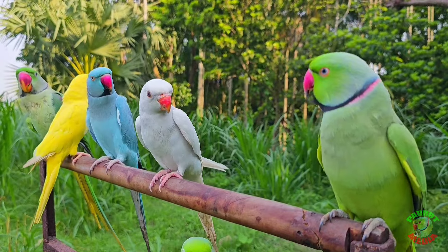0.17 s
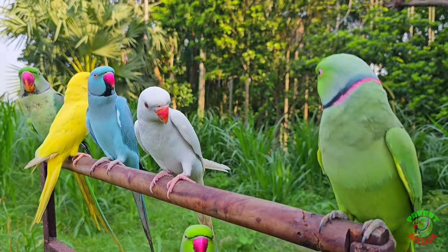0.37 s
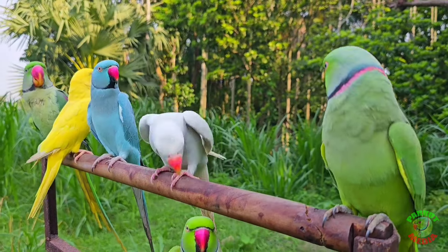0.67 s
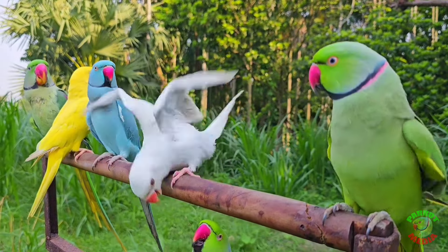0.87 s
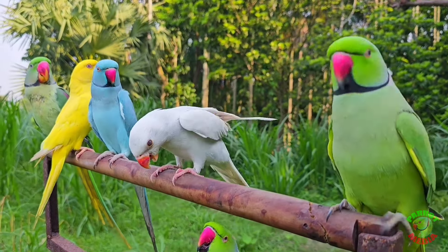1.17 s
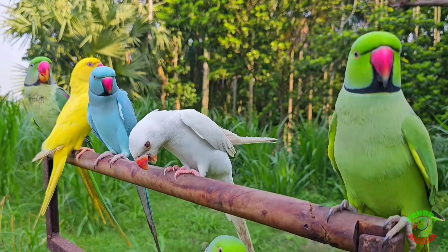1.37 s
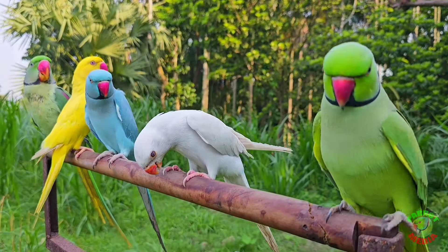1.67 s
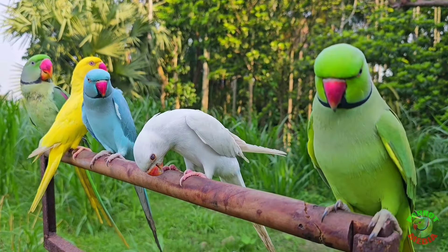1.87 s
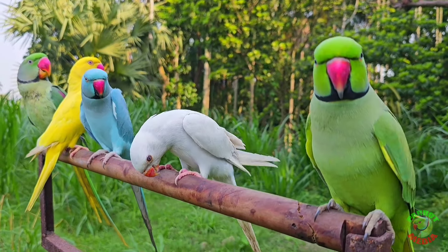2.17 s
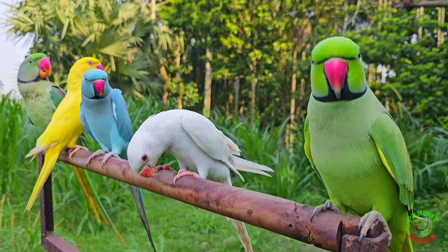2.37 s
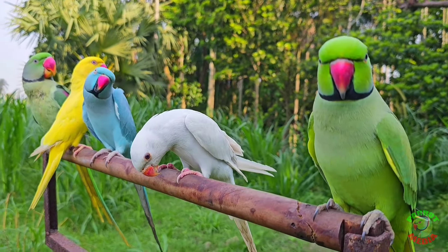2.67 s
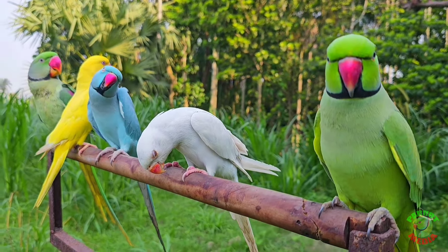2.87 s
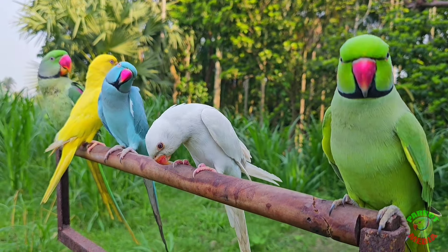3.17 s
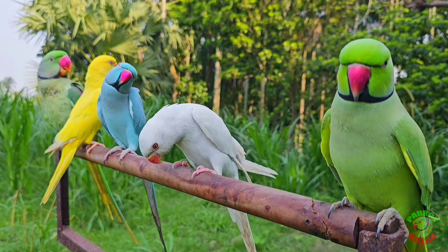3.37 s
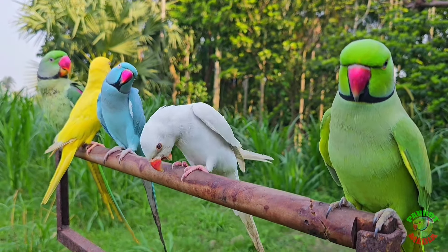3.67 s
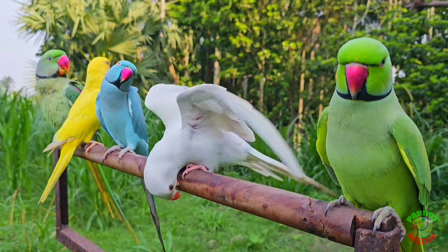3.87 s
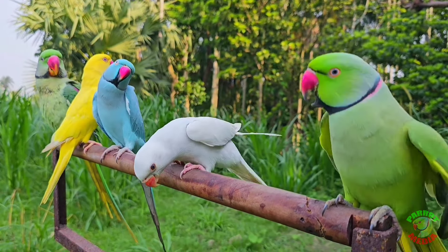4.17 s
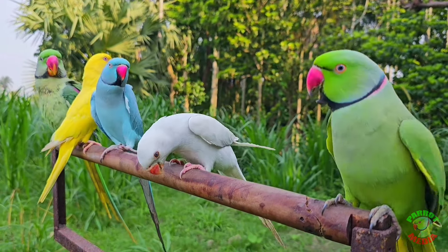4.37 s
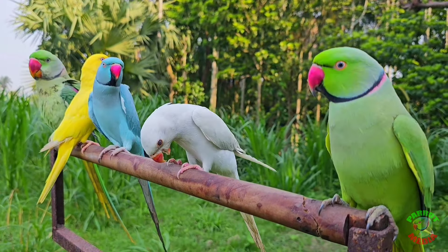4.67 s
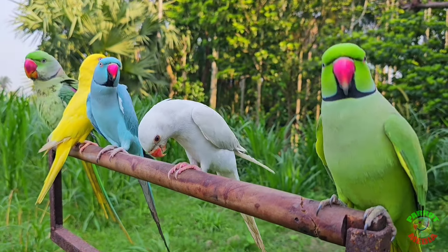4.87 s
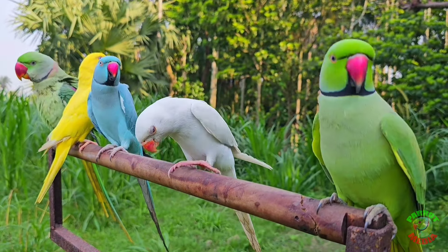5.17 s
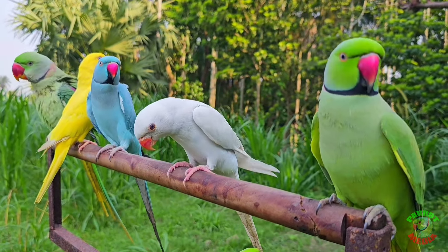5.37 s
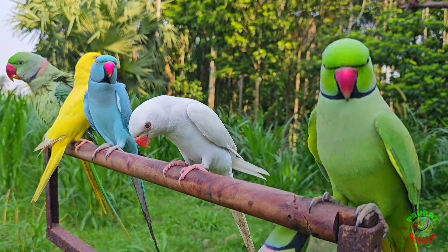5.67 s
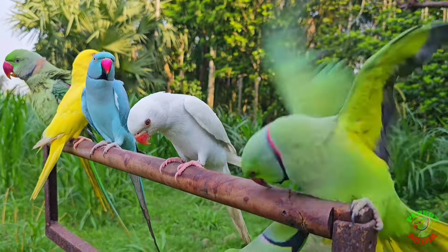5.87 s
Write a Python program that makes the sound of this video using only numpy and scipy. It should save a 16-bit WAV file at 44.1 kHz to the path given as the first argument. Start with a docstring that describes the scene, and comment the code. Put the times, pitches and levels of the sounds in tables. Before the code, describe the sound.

Parakeets very close to a stereo microphone in a quiet garden. A brief whistle and sliding yelp open, then a soft two-swell nasal warble. Whines and harsh squawks follow, then a trilled screech, bright yelps, low honks and soft wing flutter. After a lull, a rapid, evenly spaced run of raspy squawks slightly overloads the microphone. It quiets again until a last trilling screech with wing beats. Low air rumble and faint far birds lie beneath.

```python
"""Garden perch: ring-necked parakeets call close to a stereo microphone.
Squawks, whistles, yelps and screeches mix pitched harmonics with bursts of rasp that grow with chaos.
A warble, whines, grumbles and honks are harmonic buzzes coloured by a throat, with a little air.
Short blips make microphone overload crackle, decaying noise ticks, noise puffs wing beats, gliding sines far birds.
Noise tails return a faint echo; coloured noise makes the low outdoor rumble and far chorus."""
import sys
import numpy as np
from scipy import signal
from scipy.fft import rfft, irfft
from scipy.io import wavfile
from scipy.ndimage import map_coordinates

SR = 44100
rng = np.random.default_rng(int(sys.argv[2]) if len(sys.argv) > 2 else 0)


def generate_wav(sig):
    """Save sig (samples, or channels by samples) to the path in sys.argv[1] as 16-bit PCM at SR."""
    pcm = np.round(np.clip(np.atleast_2d(sig).T, -1, 1) * 32767).astype(np.int16)
    wavfile.write(sys.argv[1], SR, pcm)


N = 265967
TIME = np.arange(N) / SR

# In call tables, dB levels precede throat and mix gains; lag delays the right port.

# Harsh squawks: sweep to a crest, settle, sag, break off. Each row: crest time, rise, hold and release
# in seconds, crest, held and final pitch (before the drop) in Hz, tone effort in dB, odd harmonics in dB re
# effort, extra fourth harmonic in dB, rasp in dB, rasp at the break in dB re held rasp, left minus right
# in dB (before the beam), lag in ms.
HARSH_SQUAWKS = [(.083, 0.029, .002, .003, 2800, 2730, 2880, -18.5, -9, -12, -44, 1, 3, 0.31),
                 (1.695, 0.0062, 0.086, 0.046, 2360, 1854, 1797, -19, -10, 4.5, -20.5, 0, -0.5, 0.19),
                 (1.952, 0.0058, 0.071, 0.07, 1793, 1808, 1653, -12, -23, -2.5, -19.5, -0.5, -4, 0.21),
                 (2.225, 0.0046, 0.074, 0.067, 2392, 1807, 1734, -12, -19.5, 0.5, -20, 1.5, -13.5, 0.08),
                 (3.583, 0.0045, 0.065, 0.066, 2375, 1963, 1803, -12, -14.5, -1, -16.5, -4.5, -2.5, 0.094),
                 (3.812, .044, .002, 0.0046, 2480, 2490, 2450, -18.5, -8.5, 0.5, -26, 3.5, -5.5, .13),
                 (3.817, .004, .083, 0.064, 2350, 1882, 1647, -11.5, -15.5, 1.5, -18, -3.5, -6, .13),
                 (4.059, .04, 0.1, 0.042, 2448, 1870, 1606, -13.5, -13, 2.5, -19, 2.5, -4, .13),
                 (4.168, 0.014, 0.0012, 0.003, 2470, 2400, 2400, -13, -8, -12, -9.5, -3.5, -8.5, 0.093),
                 (4.319, .044, .094, 0.036, 2227, 1780, 1566, -13, -10.5, 0, -23, 2.5, -7.5, .32),
                 (4.567, 0.034, 0.087, 0.062, 2294, 1826, 1540, -14.5, -13, 2, -19.5, 3, -10.5, 0.12),
                 (4.821, .038, 0.1, 0.05, 2220, 1882, 1529, -12.5, -14.5, 0, -17.5, -2, -9.5, 0.11),
                 (5.076, 0.04, 0.093, 0.045, 2320, 1706, 1511, -13.5, -15.5, -2, -20.5, 1.5, -8.5, 0.13)]
# Screeches: same course, settling and dropping more slowly, with a fast trill. Columns as HARSH_SQUAWKS.
SCREECH_CALLS = [(2.669, .018, .055, 0.026, 1713, 1734, 1612, -10, -47, 0.0071, -23.5, -3.5, 6.4, .058),
                 (5.903, .037, 0.046, 0.15, 2706, 2264, 2040, -10.5, -10.5, 0.0015, -25.5, 3, 3.5, 0.049)]
# Whistles: arch over and fall. Each row: start and length in seconds, top and end pitch in Hz, second
# harmonic in dB, fourth harmonic in dB re second, rasp in dB, left minus right in dB, lag in ms.
WHISTLE_CALLS = [(0.081, 0.061, 1906, 1545, -10, -13, -38, -0.5, .342),
                 (0.205, 0.0177, 2067, 1700, -21, -25, -29.5, -7, 0.346),
                 (1.655, 0.033, 1835, 1585, -9, 1, -16.5, -8.5, .2),
                 (1.73, .08, 1845, 1800, -21, -8, -42, 4, .2),
                 (1.901, 0.061, 1236, 1200, -26.5, -16, -25, -13, .19),
                 (2.192, 0.028, 1779, 1480, -12.5, 1, -19, -22.5, .072),
                 (3.501, 0.041, 1825, 1810, -35, -12.5, -34, -10, .13),
                 (3.518, 0.061, 1923, 1650, -9.5, -3.5, -16.5, -20.5, .13),
                 (4.171, .05, 2053, 1574, -6.5, -11, -25, 3, .0031),
                 (4.363, 0.056, 1900, 1646, -14.5, -13.5, -53.5, 7, .28),
                 (4.677, 0.049, 1620, 1310, -30.5, -8, -41, -4, .112)]
# Reedy yelps: hold, then slide, nearly always down. Each row: start, length and hold in seconds, start and
# end pitch in Hz, tone effort in dB, odd harmonics in dB re effort, rasp in dB, left minus right in dB, lag in ms.
YELP_CALLS = [(0.142, 0.087, 0.049, 2570, 1336, -13.5, -14.5, -35, 6, 0.32),
              (2.717, 0.063, 0.001, 3014, 2696, -13, -26, -49, 3, 0.012),
              (2.753, 0.076, .002, 2838, 3200, -12.5, -19, -32, 7, 0.017),
              (2.821, 0.13, 0.044, 2158, 1360, -18, -16, -36, 11, 0.031),
              (4.219, 0.046, 0.0013, 2560, 1233, -10, -17.5, -23, 4.5, 0.0024),
              (4.42, 0.085, .043, 2600, 1290, -13.5, -15, -31, 1.5, 0.334),
              (5.109, 0.17, 0.097, 2169, 1493, -20.5, -12.5, -33, 3.5, 0.2)]
# Throat resonances on the even harmonics of each call. Each row: frequency in Hz, gain in dB.
HARSH_RESONANCES = [(1000, -33.5), (2400, -19), (3050, -6.5), (3350, -8.5), (3750, 0), (4400, -5),
                    (4950, -18), (5800, -13.5), (6800, -3), (7250, -6), (7700, -11.5), (9500, -12)]
SCREECH_RESONANCES = [(1200, -25), (2700, -28.5), (3150, -10), (3650, -5.5), (4250, 1.5), (4750, 0.5),
                      (5200, -7.5), (7000, -25), (9500, -39)]
YELP_RESONANCES = [(2500, -19), (3100, -8.5), (3600, -1), (4050, 1), (4500, -10), (5100, -13), (5900, -12),
                   (7200, -24), (8500, -20.5), (11000, -26)]
# Squawk overtones. Each entry: harmonic number, level in dB re odd level or fourth harmonic level.
ODD_OVERTONES = {1: -2.5, 3: -2.5, 5: -13, 7: -23.5}
EVEN_OVERTONES = {4: -2.5, 6: -17, 8: -15.5}
# Noisy skirt around each harmonic. Each entry: harmonic number, relative level in dB.
RATTLE_SKIRTS = {1: -15.5, 2: -1.5, 3: -8.5, 4: -7, 5: -1.5}
# Spectrum of turbulent air in the voice. Each row: frequency in Hz, relative level in dB.
AIR_COLOUR = [(300, -39.5), (700, -20), (1200, -13.5), (1900, -3.5), (3200, 1.5), (4800, -2), (6500, 0),
              (8500, -0.5), (11000, -4.5), (13000, -1), (15500, -16)]

# Long warble course. Each row: time in seconds, pitch in Hz, level over the harmonics in dB.
WARBLE_COURSE = [(0.605, 820, -57), (0.625, 747, -46), (0.681, 806, -40), (0.765, 755, -37.5),
                 (0.827, 682, -45.5), (0.895, 695, -49), (0.975, 963, -24.5), (1.013, 986, -24.5),
                 (1.111, 698, -49), (1.151, 742, -46), (1.225, 1060, -24.5), (1.293, 1078, -25),
                 (1.335, 953, -28), (1.393, 594, -36.5), (1.41, 611, -80)]
# Warble brightens with level. Each row: level in dB, tilt in dB per octave.
WARBLE_TILT = [(-43.5, -1), (-43, -3.5), (-35, 7)]
# Whines, gliding down. Each row: start and length in seconds, start and end pitch in Hz, bend (positive glides
# early, negative late), start, middle and end level in dB, tilt in dB per octave, left minus right in dB, lag in ms.
WHINE_CALLS = [(1.435, 0.24, 1128, 698.7, 5.5, -43, -30.5, -26, 1.5, 4, 0.18),
               (2.118, 0.11, 1277, 642, 2.2, -31.5, -22.5, -27, 5.5, 6.5, 0.18),
               (2.364, .088, 1740, 1162, -2.5, -23, -17, -26, 8.5, 3.5, 0.042),
               (2.445, 0.27, 1274, 1158, 3, -26, -19.5, -33.5, 11, 4, 0.081)]
# Rougher grumbles, gliding mostly down. Columns as WHINE_CALLS.
GRUMBLE_CALLS = [(1.83, 0.076, 2150, 1387, 2, -47, -26, -21.5, -2, 5, 0.19),
                 (1.895, 0.13, 1213, 868, 3.94, -31, -28.5, -29, 6, -1, 0.18),
                 (3.53, 0.14, 614, 702, .5, -35, -35, -34, -2, -1.5, 0.039),
                 (3.65, 0.069, 704, 649, -0.5, -33.5, -29.5, -28, 0, -1, 0.031),
                 (3.92, .065, 1240, 1125, 2.5, -36, -27.5, -34, 2, -1, 0.025),
                 (2.425, .06, 1012, 550, 1, -42, -36.5, -34.5, -3, 2.5, 0.14),
                 (4.13, 0.046, 786, 797.5, 1, -34, -30.5, -24, -1.5, 0.5, 0.039),
                 (4.93, 0.143, 686, 702, 0.82, -43, -31.5, -28.5, 1, 3, 0.24),
                 (5.07, 0.13, 710, 679, -0.5, -35, -39.5, -45, 7.5, 1, .21)]
# Honks: start firm, ease off, swell again. Each row: start and length in seconds, start, middle and end
# pitch in Hz, eased level in dB, final swell in dB re eased, left minus right in dB, lag in ms.
HONK_CALLS = [(2.52, 0.15, 578.6, 565.7, 624, -35.5, 18, 1, 0.028),
              (2.765, 0.1926, 587, 607.5, 675, -34, 17, -0.5, -0.036),
              (3.062, 0.16, 557, 584, 569.4, -36, 5, 2, -0.037)]
# Throat and beak colour of each nasal call. Each row: frequency in Hz, gain in dB.
WARBLE_COLOUR = [(600.0, -4.5), (850.0, -2.5), (1200.0, -8), (1700.0, -2), (2300.0, -10.5), (3000.0, -13),
                 (3700.0, -12.5), (4600.0, -11.5), (6000.0, -27), (8000.0, -28.5), (11000.0, -50),
                 (15000.0, -48)]
WHINE_COLOUR = [(600.0, -8.5), (850.0, -6), (1200.0, -2.5), (1700.0, -23), (2300.0, -14), (3000.0, -12),
                (3700.0, 1.5), (4600.0, -13), (6000.0, -22), (8000.0, -29), (11000.0, -41.5),
                (15000.0, -56)]
GRUMBLE_COLOUR = [(650, -9), (1100, 1), (1500, -9.5), (2100, 6), (2800, -3.5), (3500, -3), (4600, -14),
                  (8000, -19.5), (10000, -35), (15000, -33.5)]
HONK_COLOUR = [(600, -9.5), (1200, 3.5), (1700, 0.5), (2300, -12.5), (3000, -27.5), (3700, -38.5),
               (4600, -21.5), (6000, -15.5), (8000, -55), (11000, -37.5), (15000, -60)]

# Short dull crackles of microphone overload in the loudest calls. Each row: time in seconds,
# level in dB before gain.
OVERLOAD_CRACKLES = [(1.671, -22.5), (1.994, -30.5), (2.014, -24.5), (2.239, -27.5), (2.289, -27.5),
                     (3.543, -20.5), (3.56, -22), (3.834, -27.5), (3.88, -26.5), (4.073, -28.5),
                     (4.092, -22.5), (4.108, -22), (4.582, -31), (4.605, -28), (4.641, -21.5),
                     (4.648, -27.5), (4.836, -25.5), (4.876, -23)]
# Beak and claw ticks. Each row: time in seconds, level in dB before gain.
TICK_EVENTS = [(0.84, -37), (0.865, -35), (3.042, -25.5), (3.471, -45.5), (3.484, -34), (3.497, -27.5)]
# Wing beats. Each row: centre in seconds, peak level in dB, Gaussian width (sigma) in seconds.
WING_BEATS = [(2.807, -31, 0.0093), (2.895, -41, 0.14), (5.89, -36.5, 0.029), (5.952, -27, 0.017),
              (6.016, -39.5, .025)]
# Far chirps. Each row: start and length in seconds, start, middle and end pitch in Hz (before a 1 % lowering),
# middle level in dB.
FAR_CHIRPS = [(0.079, 0.12, 1810, 1590, 1250, -53.5), (0.326, 0.13, 1660, 1720, 1500, -63.5),
              (3.222, .133, 3900, 5250, 3800, -66), (5.368, 0.16, 1950, 1614, 1320, -54.5),
              (5.555, 0.17, 2050, 2100, 1978, -68)]
# Garden background spectrum. Each row: frequency in Hz, relative density in dB per Hz.
GARDEN_COLOUR = [(15, -50.5), (25, -3.5), (86, 1), (154, -9.5), (186, -19.5), (326, -24.5), (415, -31.5),
                 (450, -25), (790, -30), (1280, -37), (1720, -23), (2240, -33), (4500, -38.5),
                 (5420, -33.5), (15000, -57)]

LAUNCH_HZ, RISE_POWER = 522, 2.3  # pitch at squawk start; rounding of the rise
SWELL_SHARE = 0.7  # share of the rise over which the voice swells
ATTACK_DB, RELEASE_DB = -9.5, -34.5  # tone re hold
RASP_ATTACK_DB, RASP_RELEASE_DB, BREAK_S = -14, -24.5, 0.012  # levels re held rasp
BEAM_HZ, BEAM_WIDTH_HZ, BEAM_DB = 1880, 310, -8.5  # near this pitch a squawk leans right

WHISTLE_TOP_SHARE, WHISTLE_SCOOP_SHARE = 0.38, .03  # place of top re length; flat start re top pitch
WHISTLE_ODD_DB = -37.5  # re second harmonic
WHISTLE_ATTACK_S, WHISTLE_ATTACK_DB, WHISTLE_FADE_DB = 0.0073, -12, -9.5

YELP_SAG_PER_S, YELP_FALL_POWER = .35, 1.5  # sag as a share of the pitch
YELP_ODD_RISE_DB, YELP_FADE_DB, YELP_RASP_FADE_DB = 3, -20, -15.5  # reached at the end of the slide

HONK_ATTACK_DB, HONK_END_DB, HONK_SWELL_SHARE = 5.5, -3.5, 0.857  # dB re eased middle; place re length
HONK_TILT_DB_PER_OCT, HONK_TILT_PER_EFFORT_DB = -5.5, 0.6167


def undb(db):
    """Decibels to gain."""
    return 10 ** (np.asarray(db) / 20)


def colour_db(hz, points):
    """Read a spectrum on a log-frequency axis."""
    at_hz, db = np.transpose(points)
    return np.interp(np.log(np.maximum(hz, 1)), np.log(at_hz), db)


def noise(points, size):
    """Noise of a given colour, rms 1."""
    spectrum = rfft(rng.standard_normal(size))
    x = irfft(spectrum * undb(colour_db(np.fft.rfftfreq(size, 1 / SR), points)), size)
    return x / x.std()


def walk(rate_hz, size):
    """Smooth random wander, spread near 1."""
    steps = np.arange(size) / SR * rate_hz
    return map_coordinates(rng.standard_normal(4096), [steps], order=2, mode="wrap")


def partial(k, hz, phase):
    """One harmonic, rms 1, silent above 0.4 of the sample rate."""
    return np.sqrt(2) * np.sin(k * phase) * (k * hz < SR * .4)


def arch(x, start, middle, end):
    """A parabola through three values as x runs from 0 to 1."""
    return start + (end - start) * x + (4 * middle - 2 * start - 2 * end) * x * (1 - x)


def course(length_s):
    """Time steps through a call, in seconds and as a share of its length."""
    x = np.linspace(0, 1, 100)
    return x * length_s, x


def gesture(lag_ms, *curves):
    """One call: its lag between ports and its control curves side by side."""
    return lag_ms, np.column_stack(np.broadcast_arrays(*curves))


def controls(rows, fade_s):
    """Sample times of a call, its fade in and out, and its control curves."""
    s, *columns = np.transpose(rows)
    t = TIME[(TIME >= s[0]) & (TIME <= s[-1])]
    edge_s = np.minimum(t - t[0], t[-1] - t)
    gate = np.sin(np.pi / 2 * np.clip(edge_s / fade_s, 0, 1)) ** 2
    return t, gate, [np.interp(t, s, c) for c in columns]


def place(x, pan_db, lag_ms):
    """A source reaches the two ports with a level and a time difference."""
    late = map_coordinates(x, [np.arange(len(x)) - lag_ms * SR / 1000], order=3)
    left, right = undb(pan_db / 2), undb(-pan_db / 2)
    return np.array([x * left, late * right]) / np.sqrt((left ** 2 + right ** 2) / 2)


def add(out, start_s, x):
    """Mix a stereo sound in at a given time."""
    i = int(start_s * SR)
    out[:, i:i + x.shape[1]] += x[:, :N - i]


def squawks(calls, trill_hz, trill_depth, tear_db, jitter, flicker_db, tone_db, rasp_db, rasp_pan, scatter,
            rattle_db, rattle_hz, hiss_db):
    """Syrinx membranes ring on a pitch; as they turn chaotic the tone shakes and a rasp takes over."""
    out = np.zeros((2, N))
    for lag_ms, rows in calls:
        t, gate, (hz, db, odd_db, fourth_db, harsh_db, pan_db) = controls(rows, .0025)
        size = len(t)
        chaos = 1 / np.sqrt(1 + undb(db - harsh_db) ** 2)
        trill = np.sin(2 * np.pi * trill_hz * t + .5 * walk(60, size))
        shake = jitter * chaos * walk(1100, size) + .002 * walk(150, size)
        hz = hz * (1 + trill_depth * trill + shake)
        phase = 2 * np.pi * np.cumsum(hz) / SR

        levels_db = {2: 0}
        levels_db.update({k: odd_db + d for k, d in ODD_OVERTONES.items()})
        levels_db.update({k: fourth_db + d for k, d in EVEN_OVERTONES.items()})
        tone = 0
        for k, rel_db in levels_db.items():
            flicker = flicker_db * chaos * walk(222.8, size)
            tone = tone + undb(db + rel_db + flicker) * partial(k, hz, phase)

        # irregular bursts throb with the trill and stay faint while the tone is clean
        burst_db = harsh_db + rasp_db + 1.9 * walk(450, size) + tear_db * walk(110, size)
        burst_db = burst_db - 12 * (1 - chaos) ** 2
        bursts = gate * (1 - 1.9 * trill_depth * trill) * undb(burst_db)
        rasps = []
        for _ in range(3):
            rattle = 0
            for k, rel_db in RATTLE_SKIRTS.items():
                strength = undb(rel_db) * walk(rattle_hz, size)
                rattle = rattle + strength * partial(k, hz, phase + .6 * walk(rattle_hz, size) / k)
            rasps.append(bursts * (undb(rattle_db) * rattle + undb(hiss_db) * noise(AIR_COLOUR, size)))

        # part scatters off perch and feathers and reaches each port differently
        direct = place(rasps[2], rasp_pan * pan_db, lag_ms)
        spread = np.array([place(rasps[side], rasp_pan * pan_db, 0)[side] for side in range(2)])
        rasp = np.sqrt(1 - scatter) * direct + np.sqrt(scatter) * spread
        add(out, t[0], place(gate * tone * undb(tone_db), pan_db, lag_ms) + rasp)
    return out


def through(throat, hz, effort_db, odd_db, fourth_db=0):
    """Second harmonic level, then odd and fourth re second, as the pitch crosses the resonances."""
    second, fourth = colour_db(2 * hz, throat), colour_db(4 * hz, throat)
    return effort_db + second, odd_db - second, fourth + fourth_db - second


def sweeps(table, throat, settle_s, drop, drop_s):
    """Pitch shoots up, settles, sags and drops as the note breaks, where the rasp level shifts."""
    for (s, rise, hold, release, crest_hz, held_hz, final_hz, tone_db, odd_db, fourth_db,
         rasp_db, flare_db, pan_db, lag_ms) in table:
        u = course(rise + hold + release)[0] - rise
        rising = crest_hz - (crest_hz - LAUNCH_HZ) * np.abs(u / rise) ** RISE_POWER
        held = np.interp(u, [0, hold], [held_hz, final_hz])
        held = held + (crest_hz - held_hz) * np.exp(-(u / settle_s) ** 2)
        dropping = held * (1 - drop * np.tanh(np.maximum(u - hold, 0) / drop_s))
        hz = np.where(u < 0, rising, dropping)

        full, end = -rise * (1 - SWELL_SHARE), hold + release
        effort = tone_db + np.interp(u, [-rise, full, hold, end], [ATTACK_DB, 0, 0, RELEASE_DB])
        rasp_times = [-rise, full, max(hold - BREAK_S, 0), hold, end]
        rasp = rasp_db + np.interp(u, rasp_times, [RASP_ATTACK_DB, 0, 0, flare_db, RASP_RELEASE_DB])
        beam = BEAM_DB * np.exp(-((hz - BEAM_HZ) / BEAM_WIDTH_HZ) ** 2)
        levels = through(throat, hz, effort, odd_db, fourth_db)
        yield gesture(lag_ms, s + u, hz, *levels, rasp, pan_db + beam)


def whistles():
    """A note led by its second harmonic starts a little flat, arches over and fades as it falls."""
    for s, length, top_hz, end_hz, db, fourth_db, rasp_db, pan_db, lag_ms in WHISTLE_CALLS:
        u, x = course(length)
        scoop = np.maximum(1 - x / WHISTLE_TOP_SHARE, 0) ** 2
        fall = np.maximum((x - WHISTLE_TOP_SHARE) / (1 - WHISTLE_TOP_SHARE), 0) ** 2
        hz = top_hz * (1 - WHISTLE_SCOOP_SHARE * scoop) + (end_hz - top_hz) * fall
        attack = np.interp(u, [0, WHISTLE_ATTACK_S], [WHISTLE_ATTACK_DB, 0])
        level = db + attack + WHISTLE_FADE_DB * fall
        yield gesture(lag_ms, s + u, hz, level, WHISTLE_ODD_DB, fourth_db, rasp_db + attack, pan_db)


def yelps():
    """A high reedy note sags, then slides through the throat resonances and fades."""
    for s, length, hold, start_hz, end_hz, tone_db, odd_db, rasp_db, pan_db, lag_ms in YELP_CALLS:
        u, _ = course(length)
        fall = np.interp(u, [hold, length], [0, 1]) ** YELP_FALL_POWER
        hz = start_hz * (1 - YELP_SAG_PER_S * u) * (1 - fall) + end_hz * fall
        effort = tone_db + YELP_FADE_DB * fall ** 2
        levels = through(YELP_RESONANCES, hz, effort, odd_db + YELP_ODD_RISE_DB * fall)
        yield gesture(lag_ms, s + u, hz, *levels, rasp_db + YELP_RASP_FADE_DB * fall ** 2, pan_db)


def nasal(calls, throat, gain_db, jitter, hiss_db, gape=0, settle_s=.07):
    """A steady syrinx buzz, coloured by the throat, with a little air once a cycle."""
    out = np.zeros((2, N))
    for lag_ms, rows in calls:
        t, gate, (hz, db, bright_db, pan_db) = controls(rows, .008)
        size = len(t)
        hz = hz * (1 + jitter * walk(600, size) + 0.0035 * walk(60, size))
        phase = 2 * np.pi * np.cumsum(hz) / SR
        # a beak that starts wide open lifts the resonances until it closes
        lift = 1 + gape * np.exp(-((t - t[0]) / settle_s) ** 2)
        voice, power = 0, 0
        for k in range(1, 22):
            tilt_db = bright_db * np.log2(k * hz / 2000)
            # each harmonic fades in and out on its own
            uneven_db = 1.5 * walk(57, size) + 1.8 * walk(7, size)
            gain = undb(db + colour_db(k * hz / lift, throat) + tilt_db + uneven_db)
            voice = voice + gain * partial(k, hz, phase)
            power = power + gain ** 2
        air = np.sqrt(power) * undb(hiss_db) * (1 + np.cos(phase)) * noise(AIR_COLOUR, size)
        add(out, t[0], place(gate * (voice + air) * undb(gain_db), pan_db, lag_ms))
    return out


def warble(pan_db, lag_ms):
    """Swells of pitch and loudness; the level is shared out over the harmonics."""
    s, pitch_hz, level_db = np.transpose(WARBLE_COURSE)
    t = s[0] + course(s[-1] - s[0])[0]
    hz, db = np.interp(t, s, pitch_hz), np.interp(t, s, level_db)
    bright_db = np.interp(db, *np.transpose(WARBLE_TILT))
    harmonics_hz = np.arange(1, 12)[:, None] * hz
    gains = undb(colour_db(harmonics_hz, WARBLE_COLOUR) + bright_db * np.log2(harmonics_hz / 2000))
    total_db = 10 * np.log10(np.sum(gains ** 2, axis=0))
    yield gesture(lag_ms, t, hz, db - total_db, bright_db, pan_db)


def slides(table):
    """A nasal note glides between two pitches while its level follows a parabola."""
    for (s, length, start_hz, end_hz, bend, start_db, middle_db, end_db, bright_db,
         pan_db, lag_ms) in table:
        u, x = course(length)
        hz = start_hz + (end_hz - start_hz) * np.expm1(-bend * x) / np.expm1(-bend)
        yield gesture(lag_ms, s + u, hz, arch(x, start_db, middle_db, end_db), bright_db, pan_db)


def honks():
    """A low, slightly bending note; effort sets both loudness and brightness."""
    for s, length, start_hz, middle_hz, end_hz, db, swell_db, pan_db, lag_ms in HONK_CALLS:
        u, x = course(length)
        effort = np.interp(x, [0, .5, HONK_SWELL_SHARE, 1], [HONK_ATTACK_DB, 0, swell_db, HONK_END_DB])
        bright_db = HONK_TILT_DB_PER_OCT + HONK_TILT_PER_EFFORT_DB * effort
        yield gesture(lag_ms, s + u, arch(x, start_hz, middle_hz, end_hz), db + effort, bright_db, pan_db)


def overload_crackles(gain_db, width_s, pan_db, weaker_db, spread_s):
    """Short dull crackles of microphone overload, mostly on the right, each with a weaker one close by."""
    out, t = np.zeros((2, N)), TIME[:256]
    crackle = place(t / width_s * np.exp(1 - t / width_s), pan_db, 0)
    for (s, db), chance in zip(OVERLOAD_CRACKLES, rng.uniform(-1.2, 1, len(OVERLOAD_CRACKLES))):
        add(out, s, undb(db + gain_db) * crackle)
        add(out, s + spread_s * chance, undb(db + gain_db + weaker_db) * crackle)
    return out


def ticks(gain_db, decay_s):
    """Dry little contacts of beak and claw: decaying coloured noise."""
    out, t = np.zeros((2, N)), TIME[:2048]
    for s, db in TICK_EVENTS:
        click = noise([(200, -3), (800, 24.0), (3500, 15.0), (12000, -43)], len(t)) * np.exp(-t / decay_s)
        add(out, s, place(undb(db + gain_db) * click, 0, 0))
    return out


def wings():
    """Each beat pushes a soft puff of air past the ports, with separate turbulence at each."""
    push = sum(undb(db) * np.exp(-.5 * ((TIME - s) / width_s) ** 2) for s, db, width_s in WING_BEATS)
    colour = [(20, -17), (50, 8), (110, 0.5), (220, -13.5), (500, -19.5), (3000, -34.5)]
    return push * np.array([noise(colour, N) for _ in range(2)])


def far_birds(edge_db):
    """Thin gliding whistles from the trees, flickering in level."""
    out = np.zeros((2, N))
    for s, length, start_hz, middle_hz, end_hz, level_db in FAR_CHIRPS:
        u, x = course(length)
        glide_hz = arch(x, start_hz, middle_hz, end_hz)
        rows = np.column_stack([s + u, glide_hz, level_db + arch(x, edge_db, 0, edge_db)])
        t, gate, (hz, db) = controls(rows, 0.0062)
        phase = 2 * np.pi * np.cumsum(hz) / SR
        chirp = undb(db + 4.1 * walk(94, len(t))) * partial(0.99, hz, phase)  # 1 % below the glide
        add(out, t[0], place(gate * chirp, 0, 0))
    return out


def echo(x, early_db, early_s, late_db, t60_s):
    """Quick reflections from perch and ground, then a thin tail from the trees."""
    t, ports = TIME[:SR], []
    for channel in x:
        early = noise([(300, -10.5), (3000, -4.0), (15000, -3.5)], SR) * np.exp(-t / early_s) * (t > .002)
        late = noise([(300, -15.5), (2000, -6.5), (5000, -13), (15000, -12.5)], SR)
        late = late * undb(-60 * t / t60_s) * (t > .02)
        response = undb(early_db) * early / np.linalg.norm(early) + undb(late_db) * late / np.linalg.norm(late)
        ports.append(signal.fftconvolve(channel, response)[:N])
    return np.array(ports)


def garden(gain_db, swell_db):
    """Air rumbles unevenly on the ports under a steady far chorus."""
    mid, side = noise(GARDEN_COLOUR, N), noise(GARDEN_COLOUR, N)
    air = mid + .5 * side * np.array([[1], [-1]])
    rumble = signal.sosfiltfilt(signal.butter(2, 250, fs=SR, output="sos"), air)
    chorus = air - rumble
    return undb(gain_db) * (chorus + rumble * undb(swell_db * walk(15, N)))


def scene():
    """All the birds in the garden, with the microphone's overload crackle."""
    calls = [*sweeps(HARSH_SQUAWKS, HARSH_RESONANCES, settle_s=0.016, drop=0.26, drop_s=.014),
             *whistles(), *yelps()]
    screeches = sweeps(SCREECH_CALLS, SCREECH_RESONANCES, settle_s=0.024, drop=.23, drop_s=.045)
    birds = squawks(calls, trill_hz=0, trill_depth=0, tear_db=1.77, jitter=0.014, flicker_db=3.5,
                    tone_db=1, rasp_db=-0.5, rasp_pan=0.36, scatter=0.89,
                    rattle_db=-8.0, rattle_hz=1314, hiss_db=0.5)
    birds += squawks(screeches, trill_hz=136.3, trill_depth=0.12, tear_db=2.5, jitter=0.052, flicker_db=2.5,
                     tone_db=-2.5, rasp_db=3.5, rasp_pan=0.37, scatter=0.093,
                     rattle_db=0.5, rattle_hz=888, hiss_db=3.5)
    birds += nasal(warble(pan_db=3.5, lag_ms=0.098), WARBLE_COLOUR, gain_db=1, jitter=0.0045, hiss_db=-18)
    birds += nasal(slides(WHINE_CALLS), WHINE_COLOUR, gain_db=-2.5, jitter=0.0048, hiss_db=-20,
                   gape=0.11, settle_s=0.062)
    birds += nasal(slides(GRUMBLE_CALLS), GRUMBLE_COLOUR, gain_db=-1.5, jitter=0.02, hiss_db=-13.5)
    birds += nasal(honks(), HONK_COLOUR, gain_db=-2, jitter=0.0095, hiss_db=-33.5)

    crackle = overload_crackles(gain_db=11, width_s=0.000089, pan_db=-36.5, weaker_db=-1, spread_s=.02)
    near = birds + ticks(gain_db=-8.5, decay_s=0.0058)
    near += echo(birds, early_db=-8.5, early_s=0.0076, late_db=-28.5, t60_s=0.36)
    far = far_birds(edge_db=-2.5)
    far = far + echo(far, early_db=-8, early_s=.03, late_db=-5, t60_s=.8)
    return near + crackle + wings() + far + garden(gain_db=-53, swell_db=4.5)


def record(dry):
    """The recorder rounds peaks near full scale and cuts the top."""
    rounded = dry / (1 + (np.abs(dry) / .88) ** 6) ** (1 / 6)
    low_pass = signal.ellip(10, .2, 80, 15800, fs=SR, output="sos")  # ripple and stop dB, edge Hz
    return signal.sosfilt(low_pass, rounded)


dry = scene()
out = record(dry)
generate_wav(out)
```